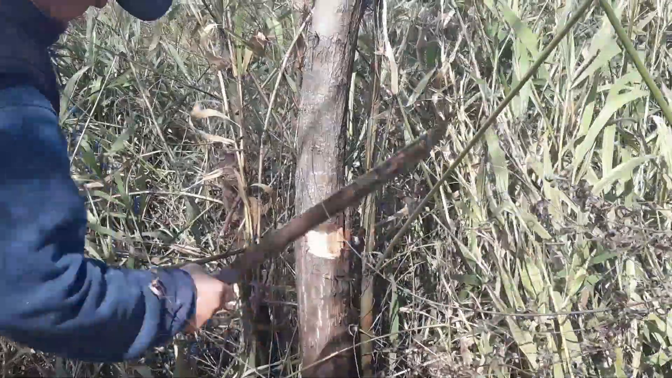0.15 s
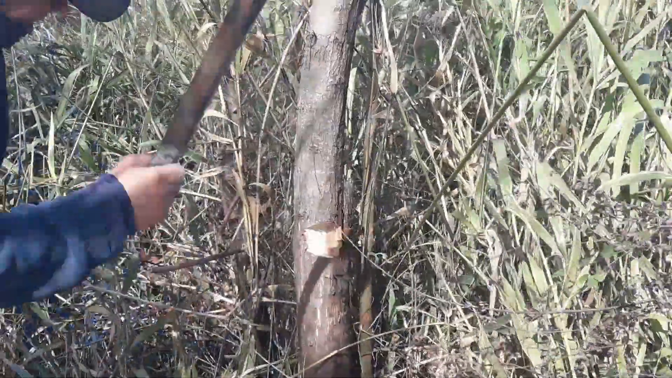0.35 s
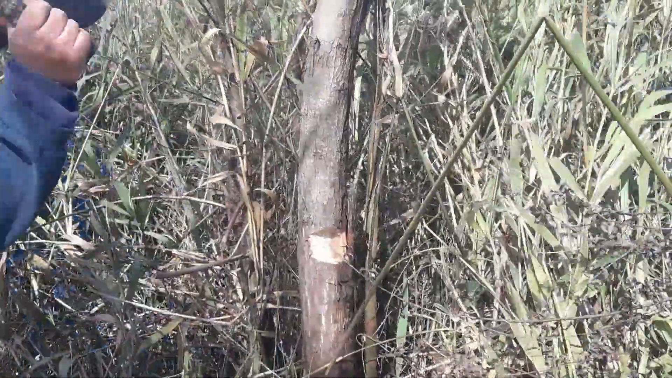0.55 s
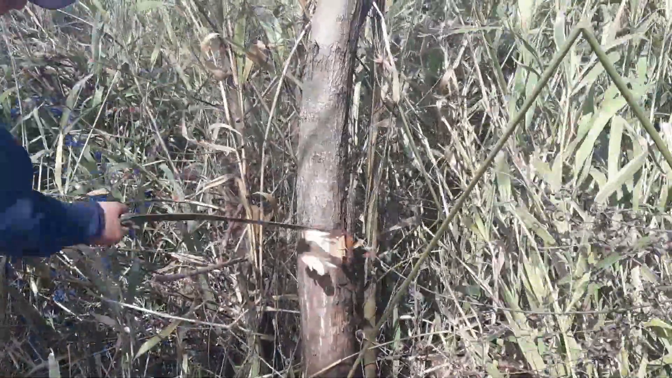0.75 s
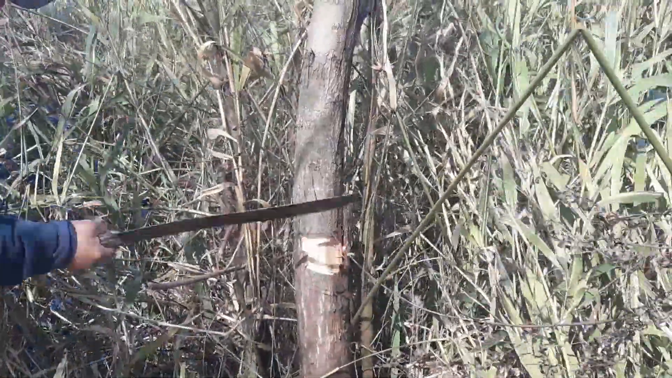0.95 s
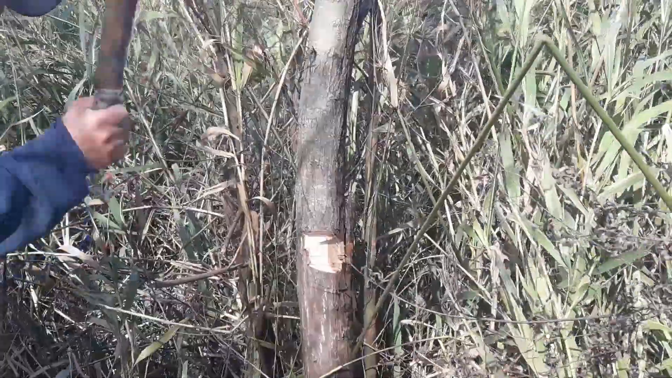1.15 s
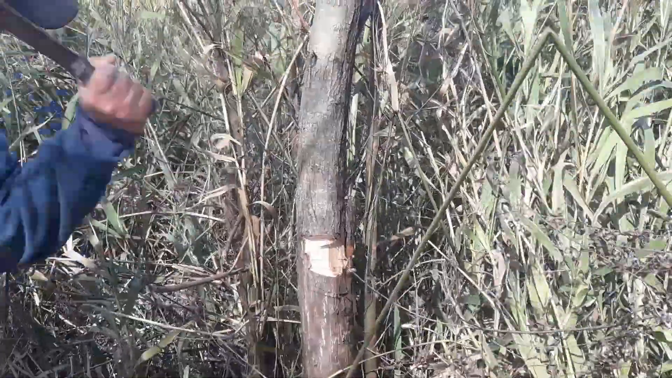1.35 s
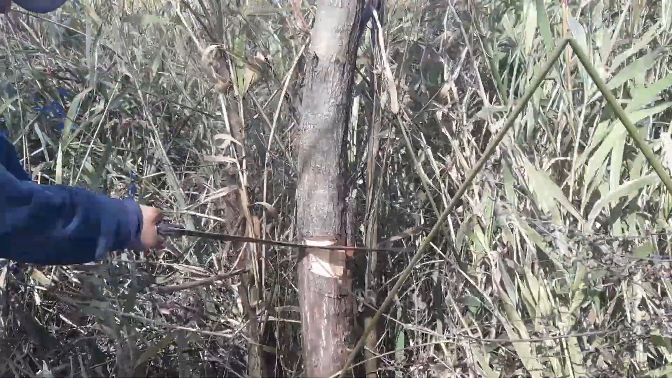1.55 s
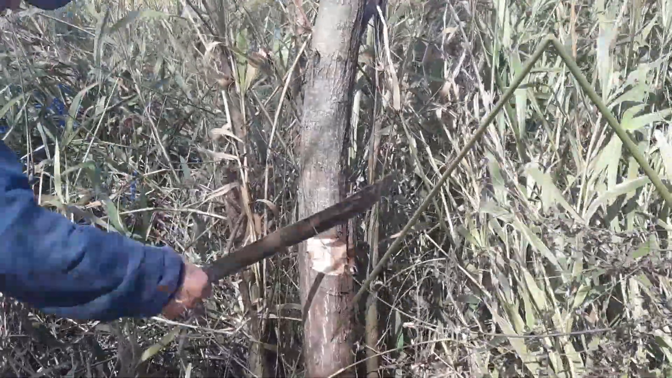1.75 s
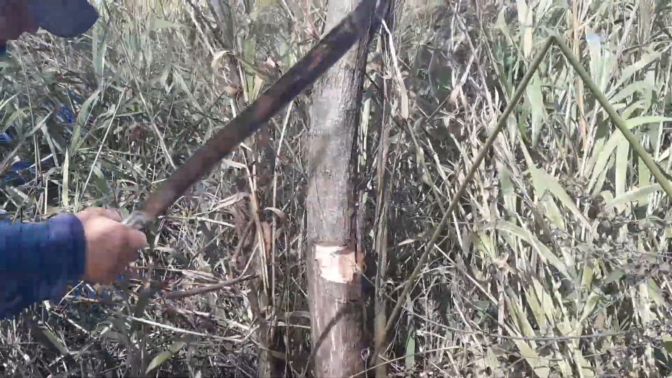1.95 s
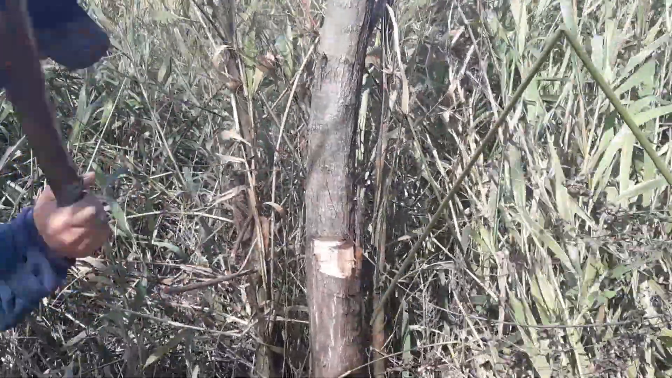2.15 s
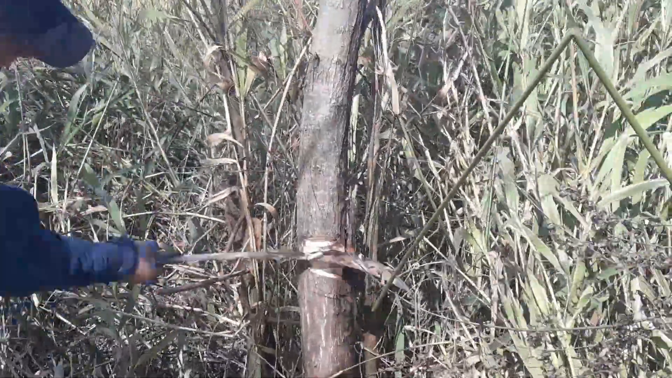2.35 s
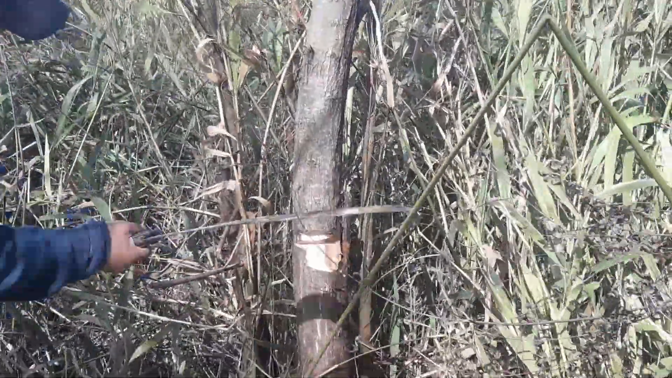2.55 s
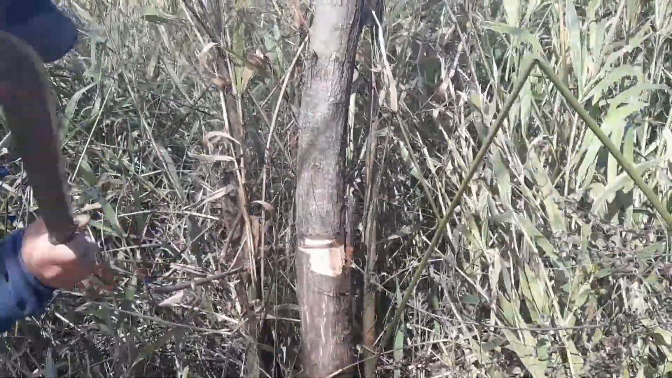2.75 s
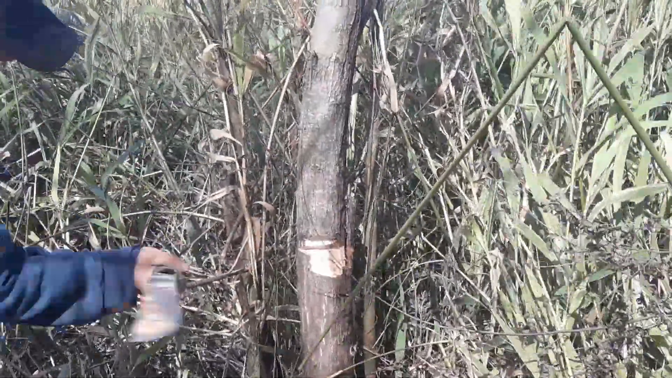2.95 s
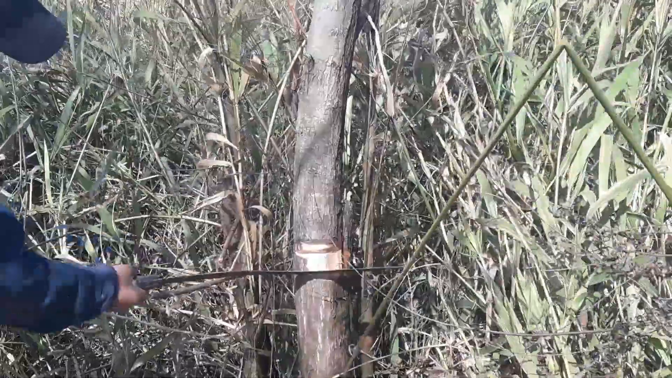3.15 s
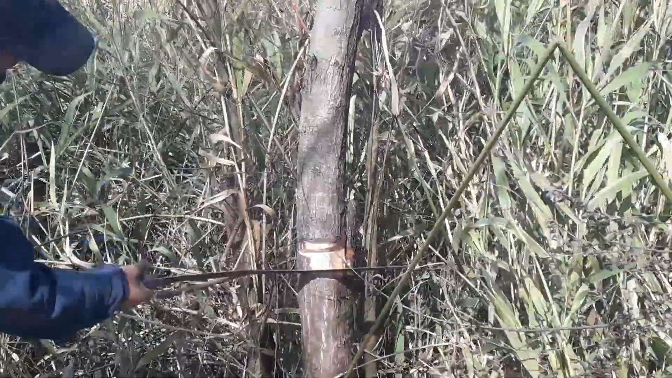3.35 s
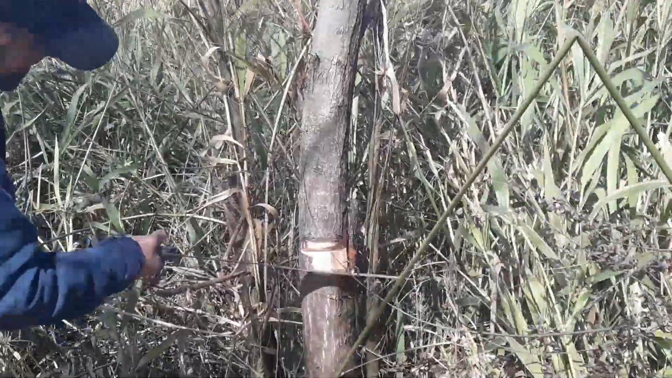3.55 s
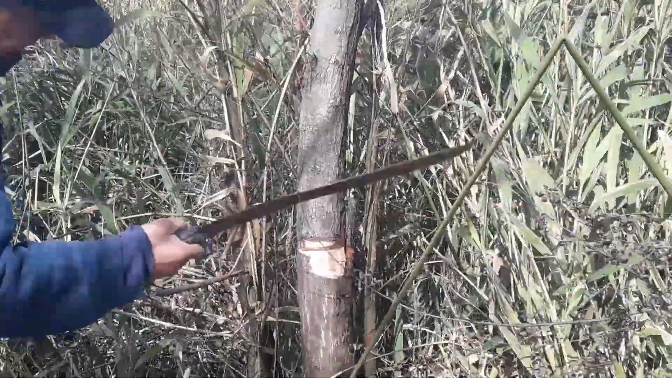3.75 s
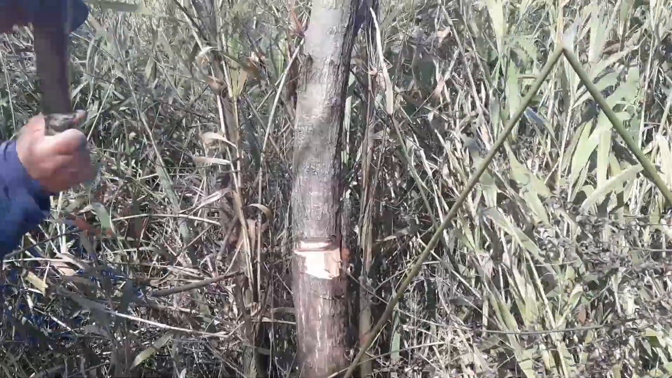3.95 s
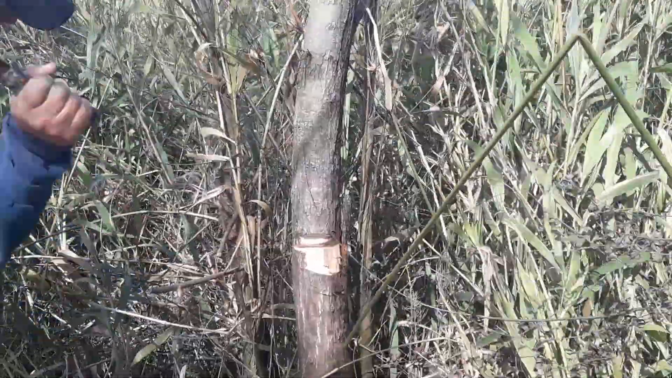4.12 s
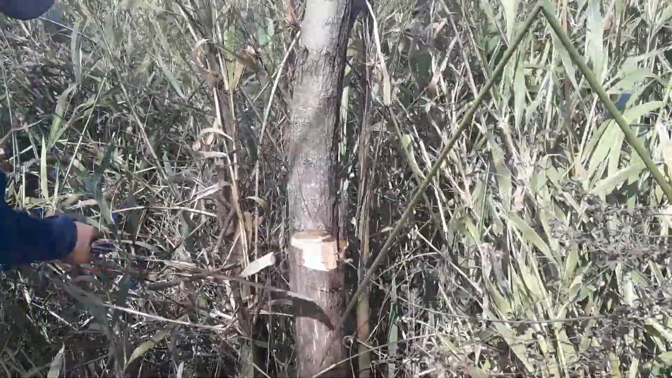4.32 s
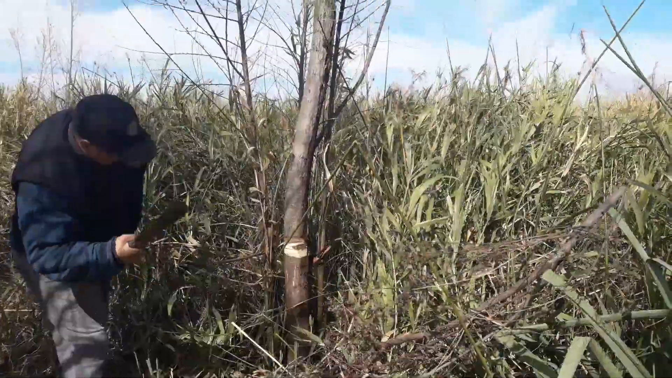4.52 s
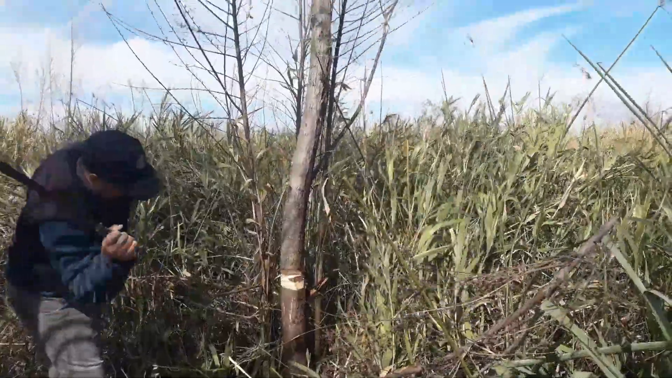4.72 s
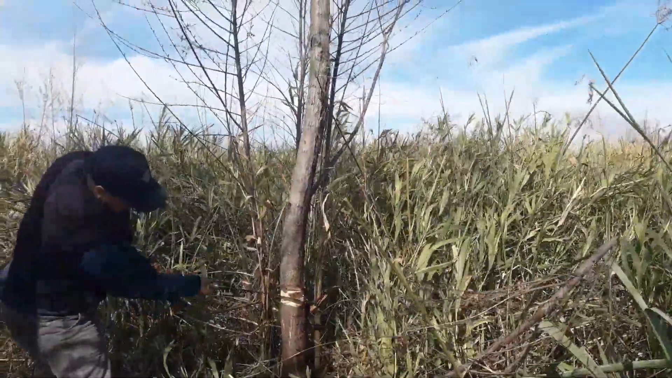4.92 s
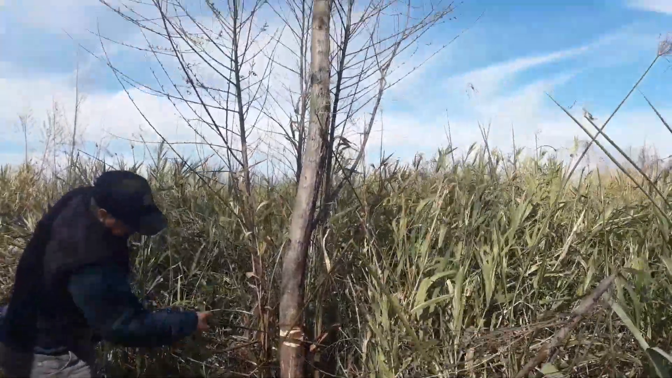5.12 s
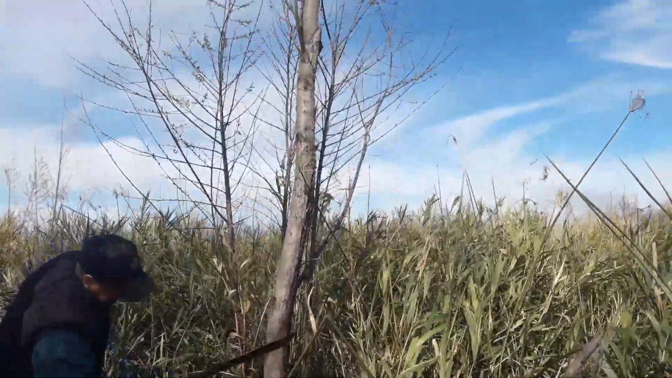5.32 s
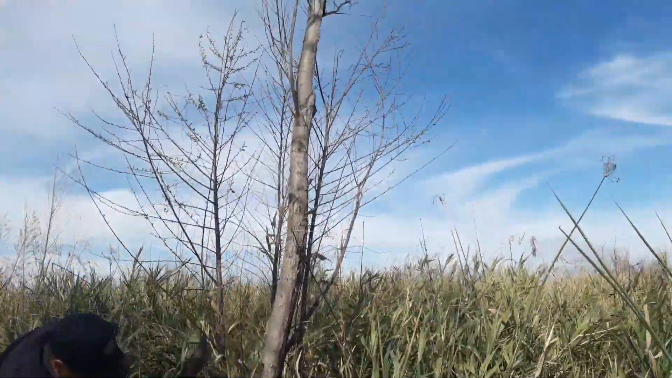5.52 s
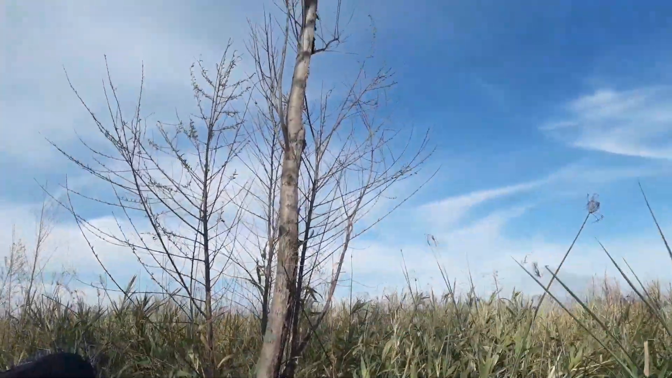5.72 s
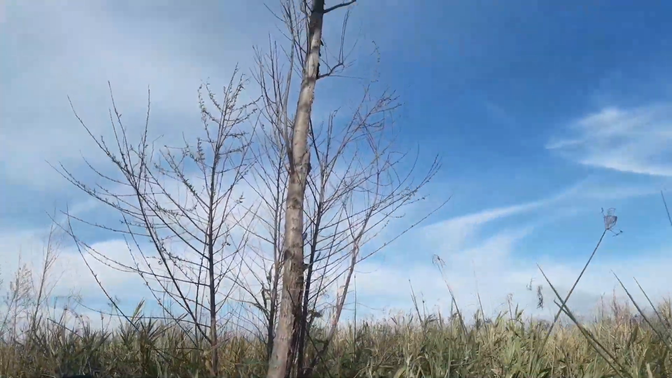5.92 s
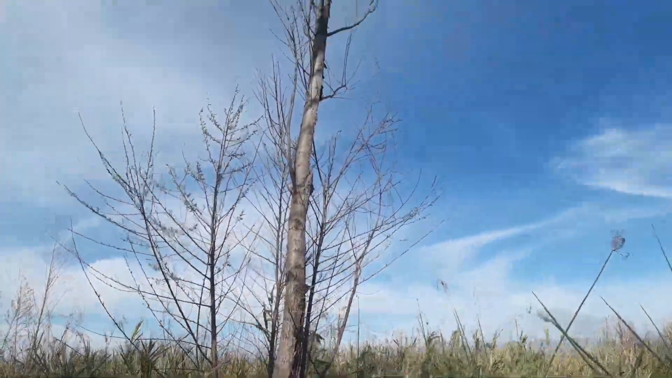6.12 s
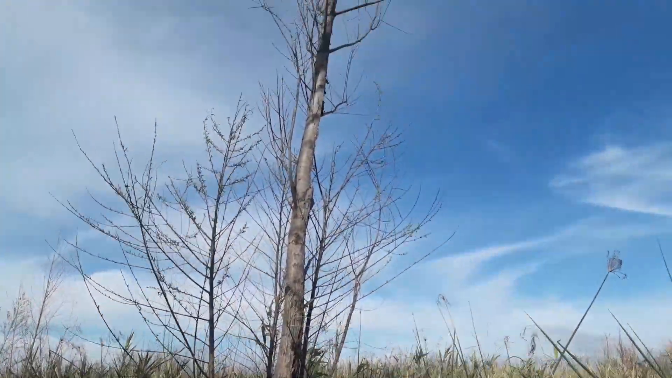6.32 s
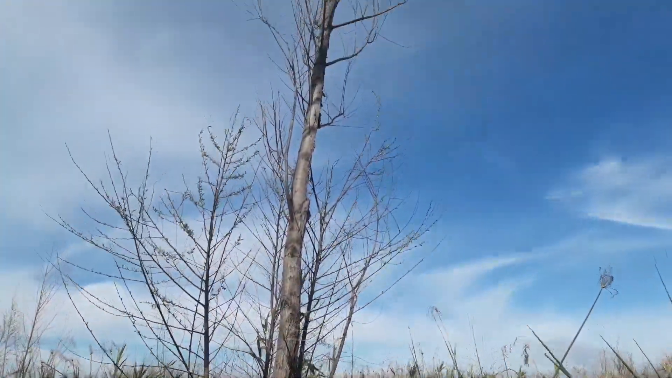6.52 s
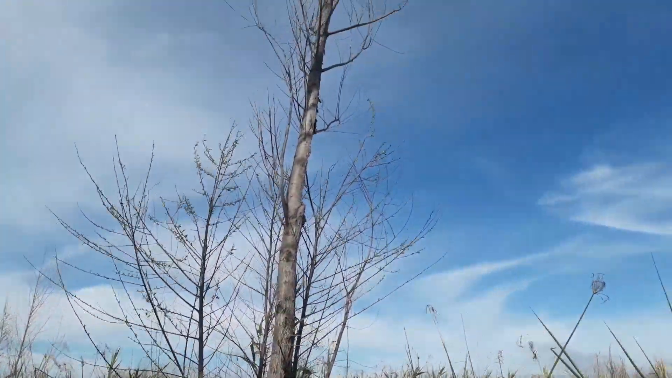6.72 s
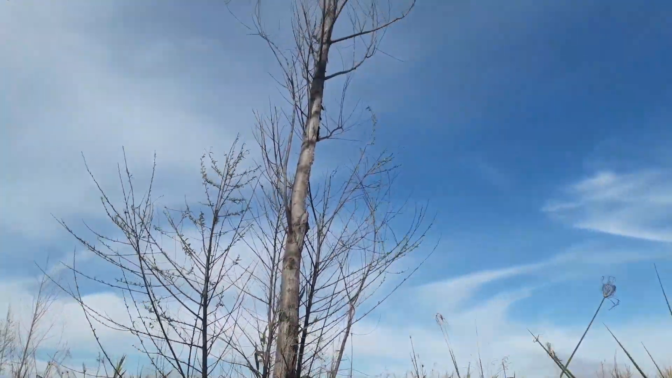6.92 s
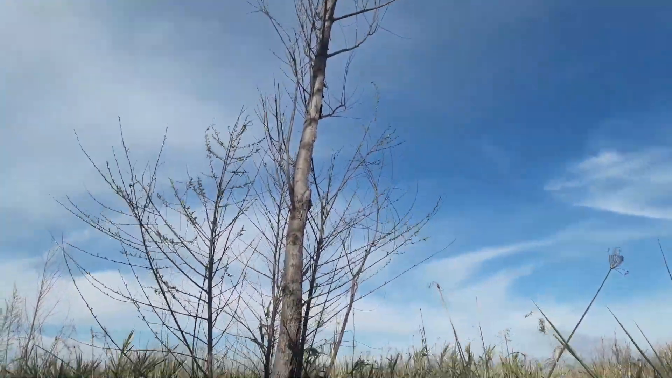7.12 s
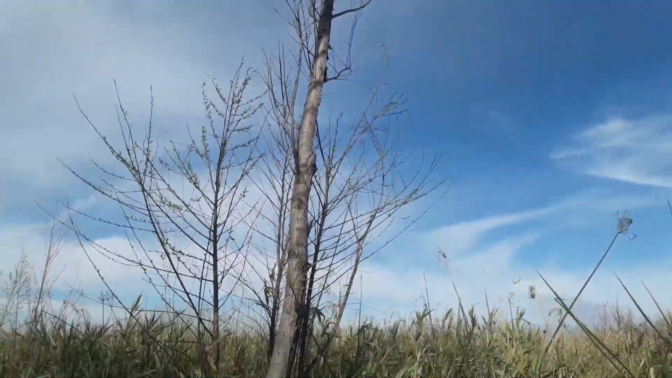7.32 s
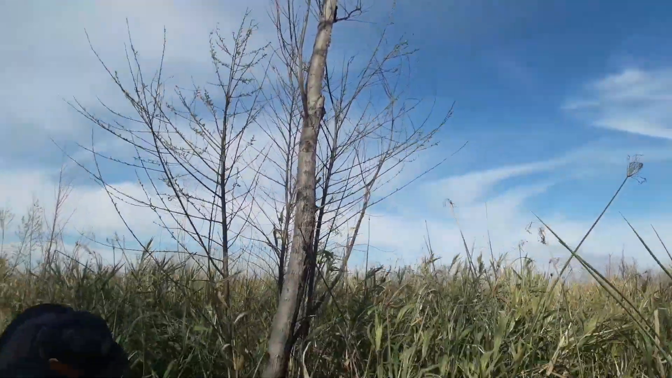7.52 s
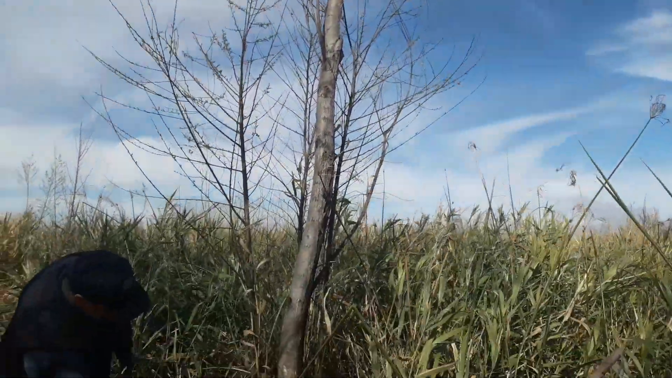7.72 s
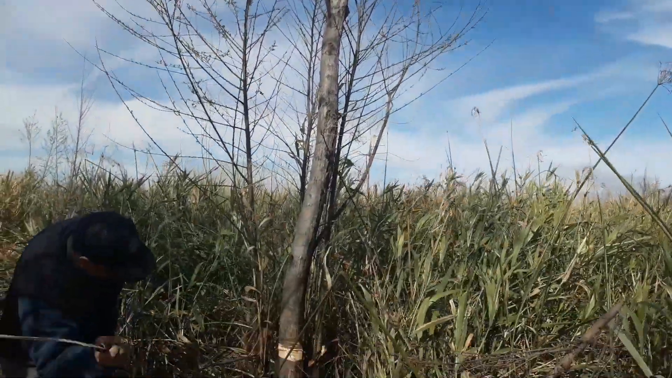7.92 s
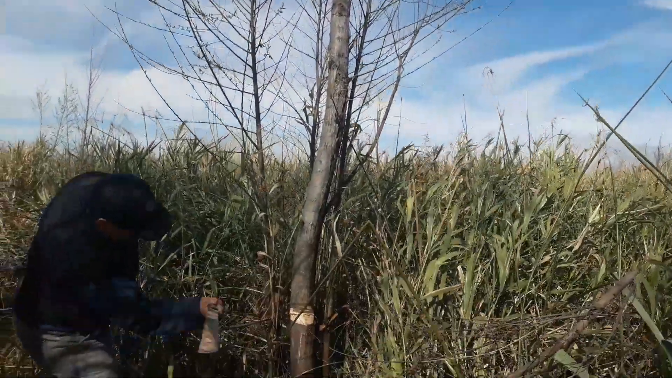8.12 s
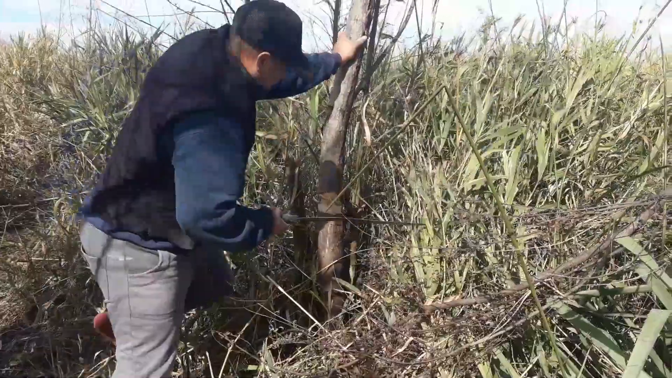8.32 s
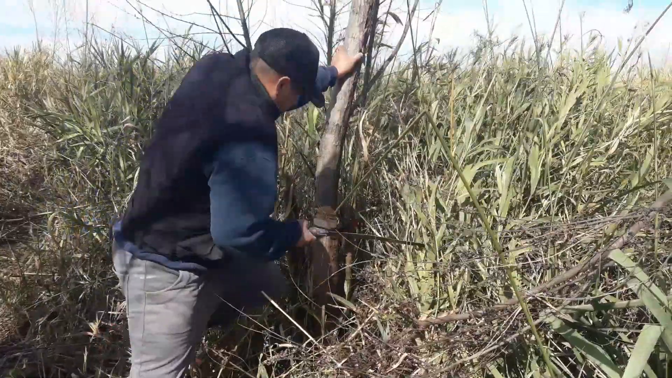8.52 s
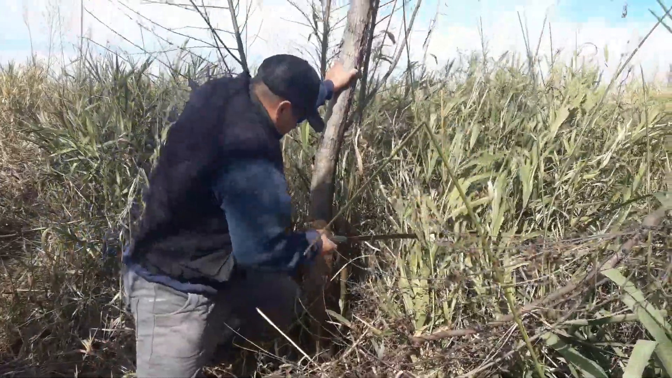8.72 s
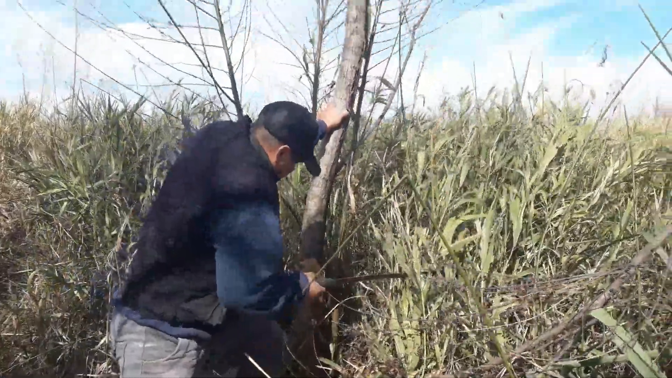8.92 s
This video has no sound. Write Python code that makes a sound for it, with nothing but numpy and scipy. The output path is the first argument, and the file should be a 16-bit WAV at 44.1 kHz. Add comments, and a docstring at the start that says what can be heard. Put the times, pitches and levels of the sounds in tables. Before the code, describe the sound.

A machete chops a thin green tree trunk outdoors, close by, over a soft hush of wind in reeds and a faint low rumble. After a light blade tap at the very start, ten blows land at about 0.8, 1.5, 2.4, 3.1, 4.3, 5.0, 6.2, 6.9, 7.6 and 8.3 seconds. Each is a sharp crack of fibres over a short, dull woody thud, with almost no echo. The hardest fall at 4.3 and 5.0 seconds; these and the first and third add a brief steel ring. Dry leaves rustle around 1 second, and small ticks of the blade coming free and stalks breaking fall between blows, clearest near 1.1 and 1.9 seconds. From about 5.6 to 7.4 seconds, wind buffets the microphone with low thumps and fluttering rumble. A sharp little snap at 8.7 seconds and light rustling close the sound.

```python
"""At the edge of a reed bed, a machete chops ten times into a thin green trunk.
Each blow is a crack of breaking fibres over the thud and knock of the trunk's damped modes, scattered
by the stalks; some contacts set the steel ringing. Between blows the blade ticks as it is worked free.
Wind draws a hush from the reeds, dry leaves rustle by friction, and turbulence buffets the microphone."""
import sys
import numpy as np
from scipy import signal
from scipy.fft import rfft, irfft
from scipy.io import wavfile
from scipy.ndimage import uniform_filter1d

SR = 44100
rng = np.random.default_rng(int(sys.argv[2]) if len(sys.argv) > 2 else 0)


def transcribe(signal):
    """Save signal, clipped to [-1, 1], as a 16-bit WAV file at the path in sys.argv[1]."""
    frames = np.atleast_2d(signal).T
    limited = np.clip(frames, -1, 1)
    pcm = np.round(limited * 32767).astype(np.int16)
    wavfile.write(sys.argv[1], SR, pcm)


N = 399973


def from_db(db):
    """Amplitude ratio of a level in decibels."""
    return 10 ** (np.asarray(db) / 20)


def unit_rms(x):
    """Normalisation to an rms of 1."""
    return x / np.sqrt(np.mean(x ** 2) + 1e-20)


def add(track, s, sound):
    """Superposition of a sound on a track from time s on."""
    start = max(round(s * SR), 0)
    track[start:start + len(sound)] += sound[:N - start]


def colour(spectrum, size, peak_hz=3000, peak_db=0):
    """Frequency response: a spectrum plus one resonance about half an octave wide."""
    octave = np.log2(np.maximum(np.fft.rfftfreq(size, 1 / SR), 1))
    hz, db = np.transpose(spectrum)
    resonance = peak_db * np.exp(-((octave - np.log2(peak_hz)) / 0.28) ** 2)
    return from_db(np.interp(octave, np.log2(hz), db) + resonance)


def noise(spectrum, size):
    """Stationary noise: a given spectrum with random phases; rms 1."""
    gain = colour(spectrum, size)
    return unit_rms(irfft(gain * np.exp(2j * np.pi * rng.random(len(gain))), size))


def crackle(envelope, spectrum, peak_hz=3000, peak_db=0, smooth_bins=400):
    """Source and filter: a noise burst is whitened, then coloured; it has the envelope's energy."""
    push = rfft(rng.standard_normal(len(envelope)) * envelope, SR)
    push /= np.sqrt(uniform_filter1d(np.abs(push) ** 2, smooth_bins) + 1e-12)
    sound = irfft(push * colour(spectrum, SR, peak_hz, peak_db), SR)[:len(envelope)]
    return sound * np.linalg.norm(envelope) / np.linalg.norm(sound)


def drift(rate):
    """Random modulation that changes about rate times a second; rms 1."""
    knots = np.arange(N) / SR * rate
    return unit_rms(np.interp(knots, np.arange(8192), rng.standard_normal(8192)))


def low_pass(x, hz):
    """Third-order Butterworth low-pass."""
    return signal.sosfilt(signal.butter(3, hz, fs=SR, output="sos"), x)


def burst(t, rise_s, t60):
    """Transient envelope: a quick rise and an exponential decay; peak 1."""
    shape = (1 - np.exp(-(t / rise_s) ** 2)) * from_db(-60 * t / t60)
    return shape / shape.max()


def swell_db(s, rise_s, fall_s, hold_s=0):
    """Exponential growth to 0 dB at time s, hold and decay; rise and fall each span 20 dB."""
    t = np.arange(N) / SR - s
    attack_db = 20 * np.minimum(t / rise_s, 0)
    release_db = -20 * np.maximum((t - hold_s) / fall_s, 0)
    return np.maximum(attack_db + release_db, -200)


# Wind strength, as the loudness of the reeds: (time [s], level [dB])
HUSH_LEVELS = [(0, -46), (0.35, -47.5), (0.8, -39), (1.25, -45), (2.38, -41), (2.7, -47), (3.65, -46.5),
               (4.27, -40), (4.55, -46), (4.93, -41.5), (5.15, -50), (5.52, -51.5), (5.88, -42),
               (6.55, -50.5), (7.42, -51), (7.72, -45), (8.1, -46), (8.45, -43.5), (9.07, -43.5)]
CALM_DB = -46   # hush in an average light wind


def wind_db():
    """Wind strength at every sample, in dB relative to a light wind."""
    times, levels = np.transpose(HUSH_LEVELS)
    return np.interp(np.arange(N) / SR, times, levels) - CALM_DB


# Spectrum of air flowing through reeds: (frequency [Hz], level [dB])
REED_SPECTRUM = [(180, -12), (300, -5.5), (494, -3.5), (546, -5.5), (737, -3), (801, -3), (915, -2.5),
                 (1720, -4), (2840, -4.5), (5340, -18), (6100, -22), (8090, -39.5), (12300, -35),
                 (15200, -49), (16000, -36)]


def reeds():
    """Flow noise: countless stalks sum incoherently to a smooth hush."""
    return from_db(CALM_DB + wind_db()) * noise(REED_SPECTRUM, N)


# Spectrum of dry leaves rubbing: (frequency [Hz], level [dB])
LEAF_SPECTRUM = [(500, -31), (1500, -18.5), (2500, 0.5), (3400, 2.5), (4500, -0.5), (5800, -2), (7700, -21),
                 (10000, -20), (13000, -17), (16000, -21)]
# Leaves and a sleeve brushed nearby: (peak time [s], level [dB], 20 dB rise [s], 20 dB fall [s])
RUSTLES = [(0.47, -43, .35, 0.12), (0.78, -34.5, 0.55, .26), (1.1, -31.5, 0.19, 0.11),
           (1.53, -45.5, 0.32, .8), (4.38, -49, 0.22, 0.83), (5.76, -47, 0.28, 1.7),
           (6.31, -52, 0.18, 0.32), (6.97, -48.5, 0.37, 0.27), (8.29, -44, .09, 0.45),
           (8.78, -43.5, 0.67, 1.1)]


def leaves():
    """Friction noise in tiny grains: rubbing by the wind and by brushing add in power."""
    stirred = from_db(-55 + 0.88 * wind_db())
    brushed_power = sum(from_db(db + swell_db(s, rise, fall)) ** 2 for s, db, rise, fall in RUSTLES)
    grains = from_db(drift(60) + 2 * drift(500))
    return np.sqrt(stirred ** 2 + brushed_power) * grains * noise(LEAF_SPECTRUM, N)


# Spectrum of light wind on the microphone: (frequency [Hz], level [dB])
RUMBLE_SPECTRUM = [(20, -29), (40, -21), (70, -4.5), (120, -2), (200, -4.5), (330, -6.5), (500, -14.5),
                   (1000, -24.5), (4000, -70)]


def breeze():
    """Pressure fluctuations at the microphone make a low rumble that follows the wind."""
    return from_db(-49.5 + 1.04 * wind_db() + 1.3 * drift(36)) * noise(RUMBLE_SPECTRUM, N)


# Spectrum of steel striking green wood: (frequency [Hz], level [dB])
CRACK_SPECTRUM = [(200, -14), (600, -1.5), (1100, -8), (1500, -4.5), (1750, -5), (2150, 1.5), (3000, 3.5),
                  (3700, -1), (4500, -2), (5300, -2.5), (6300, -15), (7500, -29.5), (16000, -28)]
# The flat of the blade touches the trunk: (time [s], level [dB])
TAPS = [(0.0269, -28.5), (0.0321, -31.5)]


def taps():
    """Light impact: a brief contact excites a broad band of frequencies."""
    out, t = np.zeros(N), np.arange(SR // 4) / SR
    contact = burst(t, 0.0012, t60=0.049)
    for s, db in TAPS:
        add(out, s, from_db(db) * crackle(contact, CRACK_SPECTRUM, peak_hz=2420, peak_db=6))
    return out


# Modes of the steel blade: (frequency [Hz], level [dB], 60 dB decay time [s])
BLADE_MODES = [(2220, -5, .06), (2680, -8, .08), (3370, -8, 0.24), (3860, 2, 0.22), (4840, -7, 0.1),
               (8720, -11, .18)]
# Contacts that ring: (time [s], level [dB], favoured frequency [Hz], added damping by wood [dB/s])
RINGS = [(0.029, -22, 3900, 250), (0.029, -27, 3370, 408), (0.807, -21.5, 3370, 10), (2.448, -19, 3900, 10),
         (4.339, -17, 3370, 10), (4.337, -24, 8720, 100), (4.976, -27, 2520, 10)]


def blade_rings():
    """Free vibration: the point of contact favours one frequency, and modes far from it ring less."""
    out, t = np.zeros(N), np.arange(SR // 4) / SR
    for s, db, favoured_hz, damping in RINGS:
        for hz, mode_db, t60 in BLADE_MODES:
            coupling_db = -26 * abs(np.log2(hz / favoured_hz)) ** 0.2
            decay_db = -(60 / t60 + damping) * t
            add(out, s, from_db(db + mode_db + coupling_db + decay_db) * np.sin(2 * np.pi * hz * t))
    return out


# Spectrum of a small fracture: (frequency [Hz], level [dB])
TICK_SPECTRUM = [(200, -27), (700, 2.5), (1200, -2), (3000, 2.5), (5800, 0), (7600, -26), (16000, -26)]
TWIGS_PER_S, TWIG_DB, TWIG_SPREAD_DB = 5, -40, 3   # levels in a light wind


def twigs():
    """Random impulses: dry stalks tick faintly, louder in a stronger wind."""
    out, t = np.zeros(N), np.arange(SR // 20) / SR
    strength_db = wind_db()
    impulse = burst(t, 0.00015, t60=0.014)
    for when, size, octaves in rng.random((int(TWIGS_PER_S * N / SR), 3)):
        db = TWIG_DB + TWIG_SPREAD_DB * (2 * size - 1) + strength_db[int(when * N)]
        tick = crackle(impulse, TICK_SPECTRUM, 3000 * 2 ** octaves, peak_db=7.5)
        add(out, when * N / SR, from_db(db) * tick)
    return out


# Spectrum of the bright, high fizz on ticks and hard blows: (frequency [Hz], level [dB])
FIZZ_SPECTRUM = [(2000, -41), (6500, 17), (7700, -1), (8700, 8), (10000, 3), (13000, 6.5), (16000, -11)]
# Blade scraping out of the cut, chips and stalks breaking:
# (time [s], level [dB], resonance [Hz], 60 dB decay time [s], fizz relative to body [dB])
TICKS = [(0.474, -29.5, 3200, 0.013, -16), (0.749, -23.5, 3000, 0.014, -7.5),
         (0.856, -26.5, 3400, 0.033, -14), (1.0975, -16.5, 3380, 0.019, -17),
         (1.1153, -25, 3000, 0.021, -11), (1.261, -38.5, 5370, .03, -16), (1.745, -32, 3200, 0.02, -24),
         (1.8038, -27, 2900, 0.0073, -15), (1.8434, -27.5, 3500, 0.069, -19),
         (1.8714, -20, 5030, 0.0092, -24), (3.4194, -32, 3200, 0.015, -23),
         (3.491, -32.5, 2700, .02, -11.5), (3.6186, -38.5, 2600, 0.14, -17),
         (4.409, -29.5, 1000, 0.046, -20), (6.189, -39.5, 3300, 0.21, -8),
         (6.305, -36.5, 3160, 0.094, -8.5), (7.13, -41.5, 5700, .072, -6),
         (8.6569, -13.5, 4930, 0.018, -22), (8.687, -26.5, 3260, 0.013, -16.5),
         (8.7434, -26.5, 2600, .045, -31)]


def ticks():
    """Sudden release of stress: each tick has a resonant body, heard with a bright fizz."""
    out, t = np.zeros(N), np.arange(SR // 4) / SR
    for s, db, peak_hz, t60, fizz_db in TICKS:
        impulse = burst(t, 0.00021, t60)
        body = crackle(impulse, TICK_SPECTRUM, peak_hz, peak_db=7)
        fizz = from_db(fizz_db) * crackle(impulse, FIZZ_SPECTRUM)
        add(out, s, from_db(db) * (body + fizz))
    return out


# Bending modes of the trunk: (nominal frequency [Hz], level [dB], time to peak [s])
THUD_MODES = [(161.5, -12, 0.00515), (260, -9.5, 0.0028), (357.4, -0.5, 0.00346), (466, -13.5, 0.00384)]
# Its higher modes: (nominal frequency [Hz], level [dB], time to peak [s])
KNOCK_MODES = [(766, -2, 0.00293), (905, -3.5, 0.00309), (1056, -10.5, 0.001907)]


def trunk(t, modes, pitch):
    """Heavy damping in wet wood: each mode swells as the blade digs in and dies within a few cycles."""
    out = np.zeros(len(t))
    for hz, db, peak_s in modes:
        envelope = (t / peak_s * np.exp(1 - t / peak_s)) ** 1.38
        out += from_db(db) * envelope * np.sin(2 * np.pi * hz * pitch * (t - peak_s))
    return out


def scatter(sound, t, t60):
    """Scattering: ground and stalks return a spray of echoes, scaled to the energy of the sound."""
    response = rng.standard_normal(len(t)) * burst(t, 0.0025, t60)
    spray = signal.fftconvolve(sound, response)[:len(t)]
    return spray * np.linalg.norm(sound) / np.linalg.norm(spray)


# Spectrum of the shaken trunk: (frequency [Hz], level [dB])
SHUDDER_SPECTRUM = [(50, -17), (120, -10.5), (200, 0.5), (330, -4), (550, -8.5), (1200, -15.5), (5000, -64)]
# Blows: (time [s], crack [dB], thud [dB], knock [dB], fizz [dB], crack resonance [Hz],
# resonance gain [dB], scatter relative to blow [dB], bite rise [s], knock pitch [ratio])
CHOPS = [(0.8025, -8, -9.5, -13, -30, 5360, 5, -9, 0.0009, .96),
         (1.5364, -13, -8.5, -11, -34, 3000, -2, -7.5, .0009, 0.98),
         (2.4461, -6.5, -11.5, -11, -27, 4240, 7, -8, 0.00057, 0.97),
         (3.0982, -10, -9.5, -12.5, -29.5, 3200, 3, -6.5, 0.0014, 1.06),
         (4.3370, -3.5, -8.5, -15, -22, 3150, 8.5, -9, 0.00058, 1.11),
         (4.9748, -3.5, -9.5, -6, -26, 2680, 5.5, -8.5, 0.00044, 1.017),
         (6.2145, -12, -11, -9.5, -30.5, 2700, 10, -7, 0.00088, 0.99),
         (6.9215, -8, -11, -13.5, -20.5, 2730, 1.5, -8, 0.00068, 0.93),
         (7.5813, -7.5, -13.5, -14, -22.5, 2700, 8, -10.5, 0.00099, .98),
         (8.2615, -11.5, -10.5, -11.5, -37, 2430, 6.5, -3.5, 0.0024, 0.96)]
CHOPS_END_S = 8.293   # the last blow stops short here


def chops():
    """Impact and fracture: the edge splits fibres and drives the trunk's modes; splinters crackle on."""
    out, t = np.zeros(N), np.arange(SR // 2) / SR
    for s, crack_db, thud_db, knock_db, fizz_db, peak_hz, peak_db, scatter_db, rise_s, pitch in CHOPS:
        # a clean bite rises fast and is over sooner than a glancing one
        bite = burst(t, rise_s, t60=0.017 + 10 * rise_s)
        crack = from_db(crack_db) * crackle(bite, CRACK_SPECTRUM, peak_hz, peak_db, smooth_bins=700)
        fizz = from_db(fizz_db) * crackle(bite ** 2 + 0.28 * burst(t, 0.0031, t60=0.11), FIZZ_SPECTRUM)
        thud = from_db(thud_db) * trunk(t, THUD_MODES, pitch=0.97)
        knock = from_db(knock_db) * trunk(t, KNOCK_MODES, pitch)
        # the bright tail has a faint longer part from the far reeds
        tail = burst(t, 0.0043, t60=0.1) + from_db(-22) * burst(t, 0.018, t60=0.41)
        grit = from_db(2.4 * drift(927)[:len(t)])
        splinters = crackle(tail * grit, CRACK_SPECTRUM, peak_hz, peak_db / 2)
        splinters *= from_db(crack_db + scatter_db - 6.5)
        shudder = from_db(thud_db - 17) * noise(SHUDDER_SPECTRUM, len(t)) * burst(t, 0.0036, t60=0.26)
        echoes = from_db(scatter_db) * scatter(thud + knock, t, t60=0.088)
        add(out, s, crack + fizz + thud + knock + splinters + shudder + echoes)
    return out * np.clip((CHOPS_END_S - np.arange(N) / SR) / 0.0012, 0, 1)


# Spectrum of turbulence on the microphone: (frequency [Hz], level [dB])
TURBULENCE_SPECTRUM = [(12, -56), (25, -37), (50, -11), (110, 1), (190, -0.5), (300, -4), (450, -4.5),
                       (700, -11), (1400, -24), (3000, -37), (6000, -70), (11000, -100)]
# Single eddies: (time [s], level [dB], Gaussian half width [s], low-pass cutoff [Hz])
EDDIES = [(2.336, -32, 0.02, 149), (2.376, -26, 0.013, 160), (2.607, -32, 0.0098, 236),
          (3.676, -34, .011, 230), (5.628, -23, 0.0028, 350), (5.668, -4.5, 0.0026, 935),
          (5.704, -12.5, .009, 1700), (5.744, -3, .0017, 2500), (5.753, -6.5, 0.0021, 2500),
          (5.766, -10, 0.0025, 700), (5.799, -21, .0044, 900), (5.846, -14.5, 0.0035, 280),
          (6.045, -19.5, .0072, 1000), (6.084, -14, 0.0081, 1830), (6.402, -11.5, 0.0028, 775),
          (6.562, -21.5, .008, 2000), (6.609, -20.5, 0.0036, 400), (6.89, -14, .011, 1175),
          (7.007, -17.5, 0.003, 2000), (7.122, -17.5, .004, 800), (7.253, -20, 0.0076, 900),
          (7.394, -25.5, 0.0078, 1170), (7.945, -31, 0.0096, 336), (8.168, -31, 0.0046, 297)]


def eddies():
    """Pressure pulses: each passing eddy thumps on the microphone for a few cycles."""
    out, t = np.zeros(N), np.arange(SR // 5) / SR
    middle = t[-1] / 2
    for s, db, half_s, cutoff_hz in EDDIES:
        swell = np.exp(-((t - middle) / half_s) ** 2 / 2)
        pulse = low_pass(crackle(swell, TURBULENCE_SPECTRUM, smooth_bins=120), cutoff_hz)
        add(out, s - middle, from_db(db) * pulse * np.linalg.norm(swell) / np.linalg.norm(pulse))
    return out


# Gusts on the microphone: (peak time [s], duration [s], level [dB], 20 dB release [s])
GUSTS = [(5.688, 0.097, -20, .14), (5.89, .12, -30.5, 0.8), (6.038, 0.13, -24.5, 0.23),
         (6.373, 0.043, -29.5, 0.08), (6.507, 0.11, -31.5, 0.2), (6.787, 0.12, -19, 0.09),
         (6.977, 0.3, -23, 0.1)]
GUST_ATTACK_S, GUST_SAG_DB_PER_S = 0.089, 9.5
FLUTTER_DB, FLUTTER_PER_S = 3, 90
BRIGHT_ABOVE_DB, SOFT_CUTOFF_HZ = -27, 343


def gusts():
    """Turbulence at the microphone port: the harder it blows, the higher its spectrum reaches."""
    t = np.arange(N) / SR
    each_db = []
    for s, hold_s, db, release_s in GUSTS:
        sag_db = GUST_SAG_DB_PER_S * np.clip(t - s, 0, hold_s)
        each_db.append(db + swell_db(s, GUST_ATTACK_S, release_s, hold_s) - sag_db)
    force = from_db(np.max(each_db, axis=0) + FLUTTER_DB * drift(FLUTTER_PER_S))
    brightness = 1 / (1 + (from_db(BRIGHT_ABOVE_DB) / (force + 1e-6)) ** 1.44)
    soft = unit_rms(low_pass(noise(TURBULENCE_SPECTRUM, N), SOFT_CUTOFF_HZ))
    bright = noise(TURBULENCE_SPECTRUM, N)
    return force * (np.sqrt(1 - brightness ** 2) * soft + brightness * bright)


def scene():
    """Superposition of all sources at one microphone."""
    mix = reeds() + leaves() + breeze() + taps() + blade_rings() + twigs() + ticks() + chops()
    return (mix + eddies() + gusts())[None]


def record(dry):
    """Saturation flattens the loudest peaks; a low-pass limits the band to 16 kHz."""
    saturated = dry / (1 + np.abs(dry) ** 6) ** (1 / 6)
    return signal.sosfilt(signal.ellip(10, 0.1, 80, 16000, fs=SR, output="sos"), saturated)


dry = scene()
out = record(dry)
transcribe(out)
```